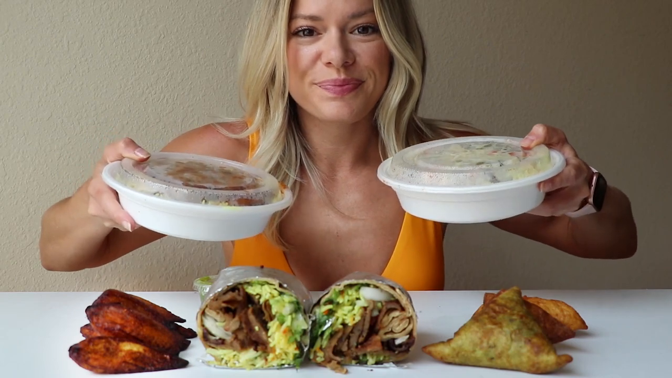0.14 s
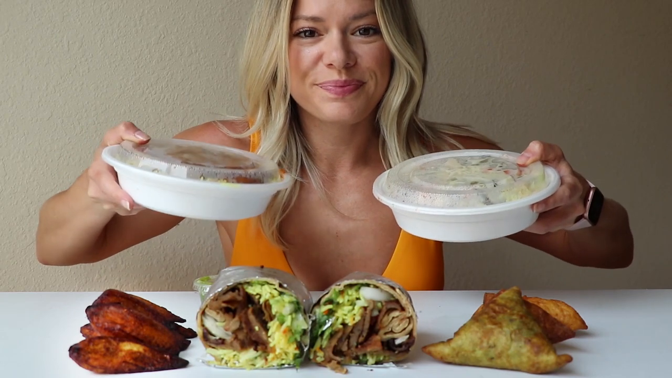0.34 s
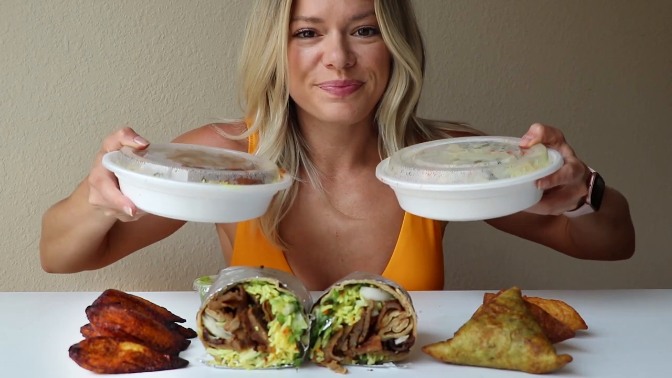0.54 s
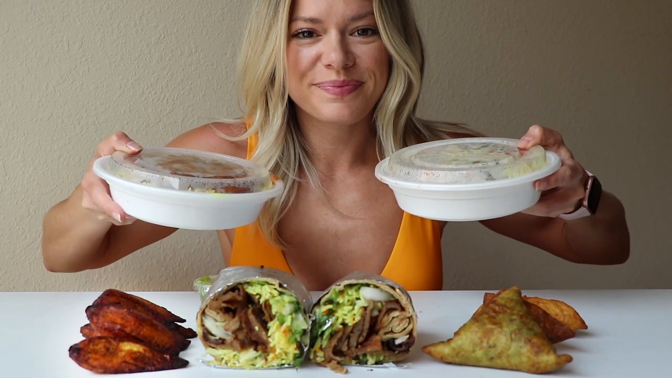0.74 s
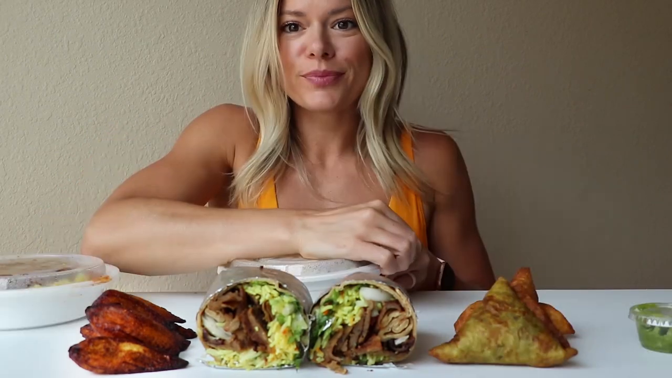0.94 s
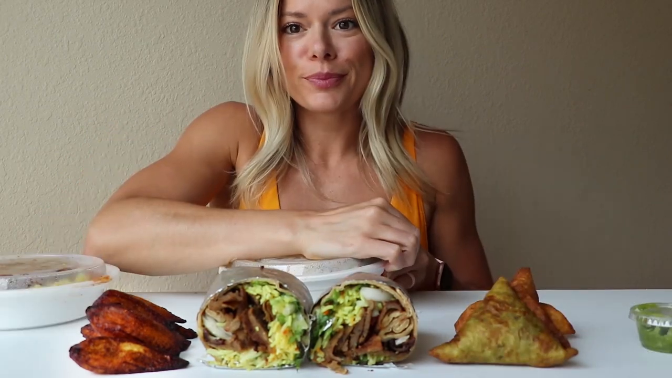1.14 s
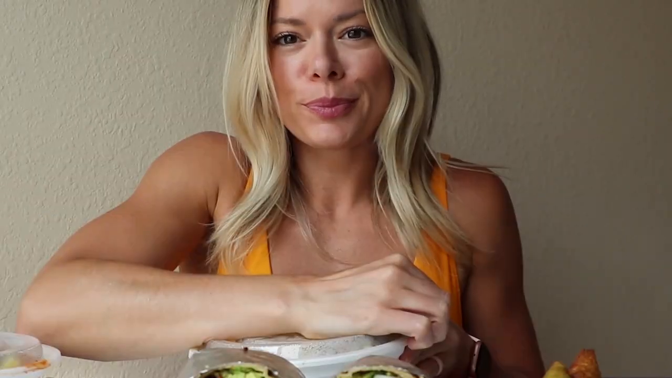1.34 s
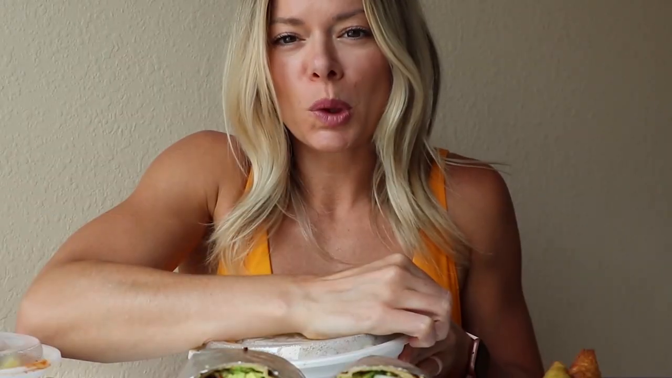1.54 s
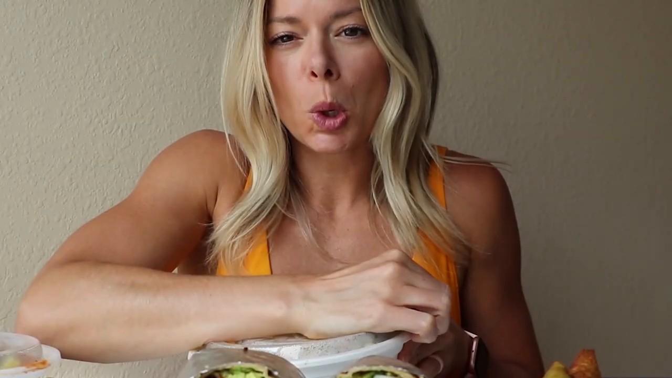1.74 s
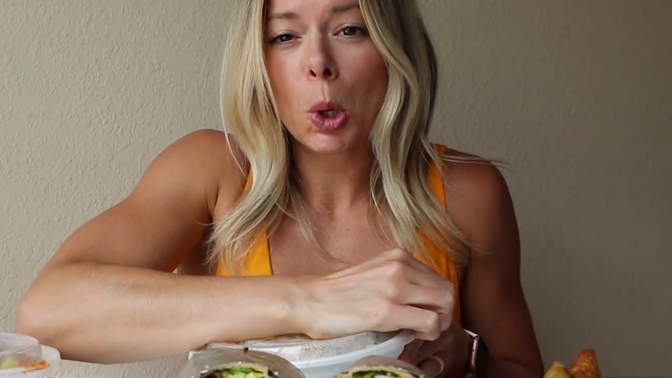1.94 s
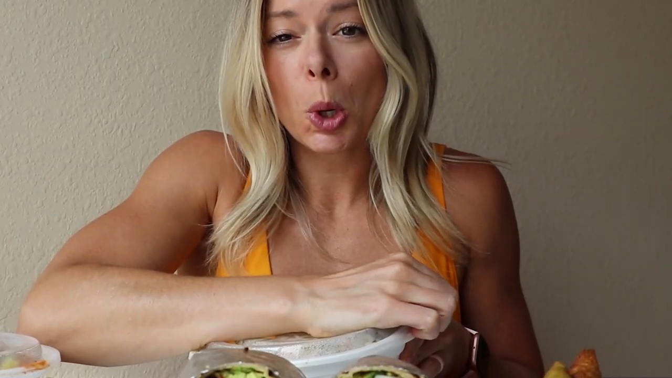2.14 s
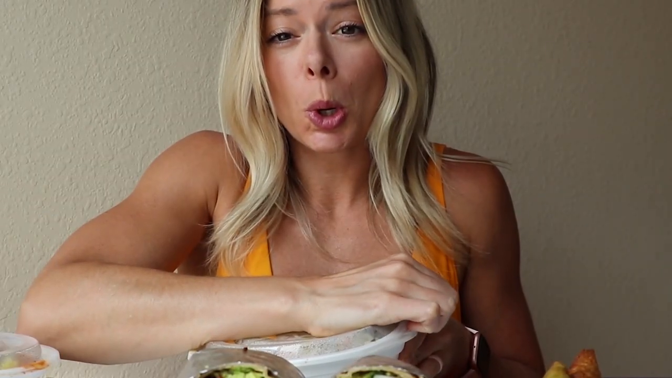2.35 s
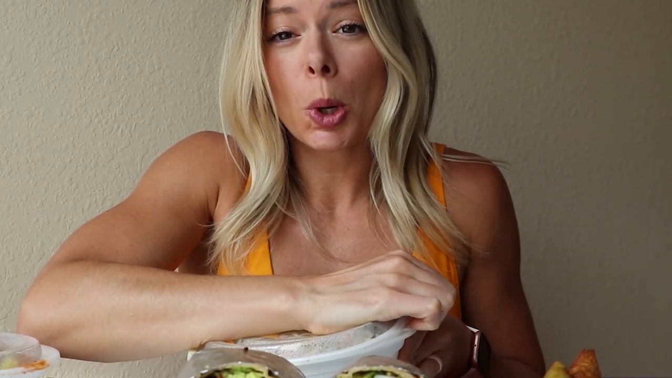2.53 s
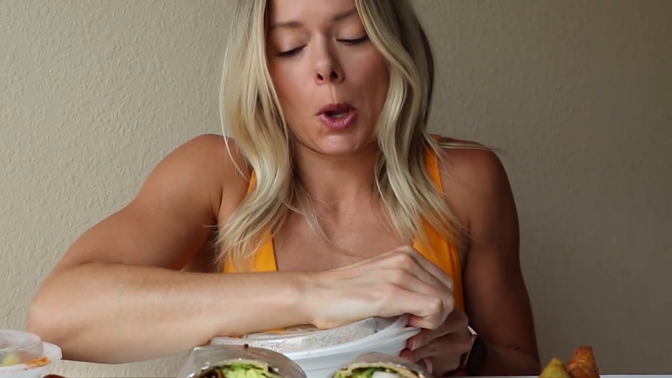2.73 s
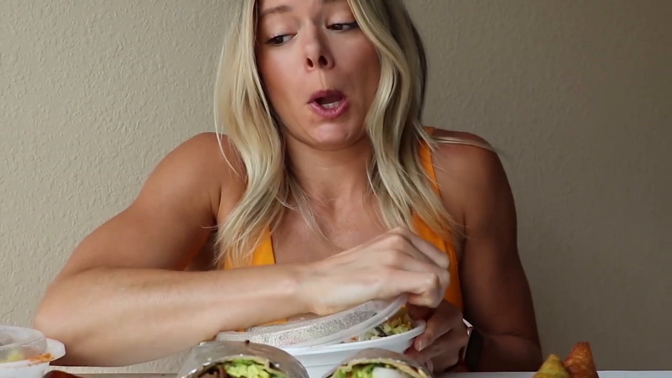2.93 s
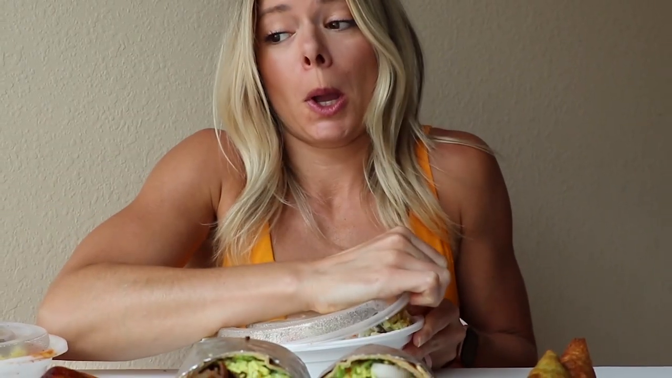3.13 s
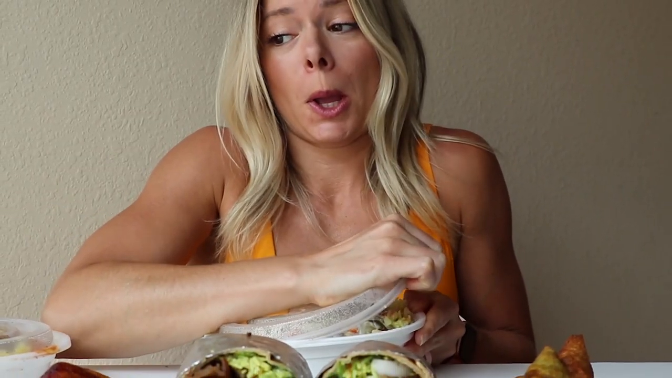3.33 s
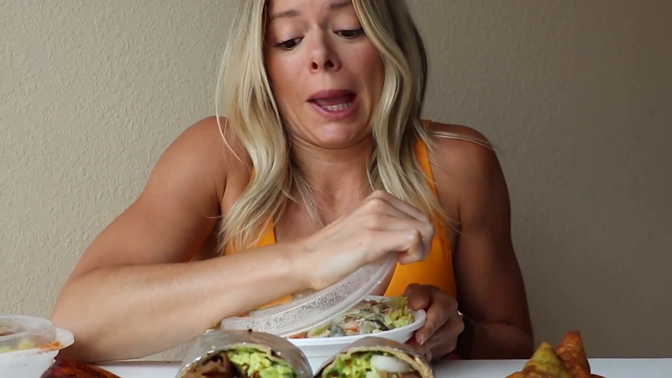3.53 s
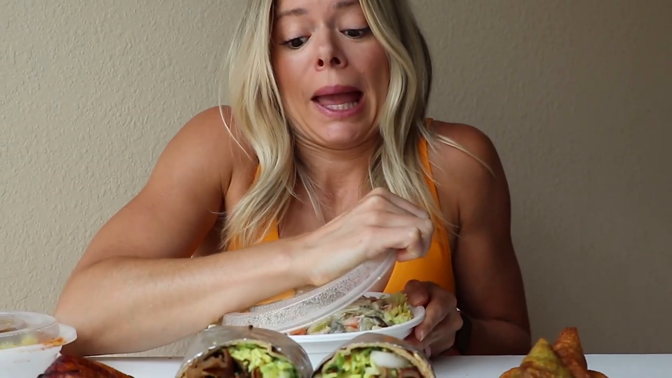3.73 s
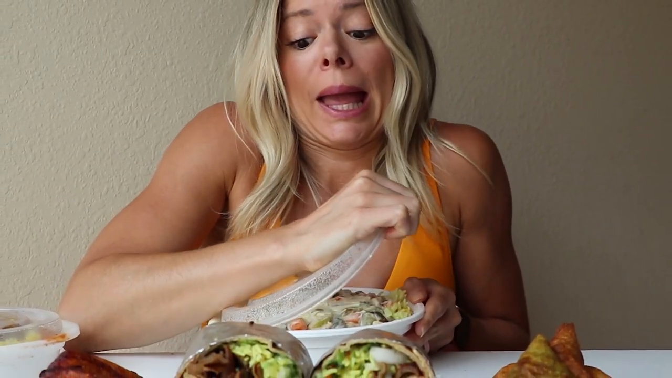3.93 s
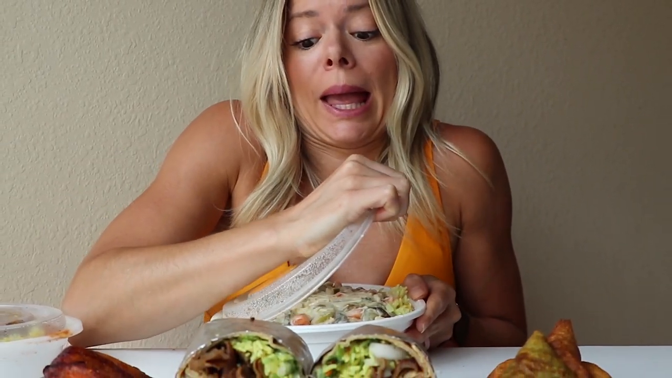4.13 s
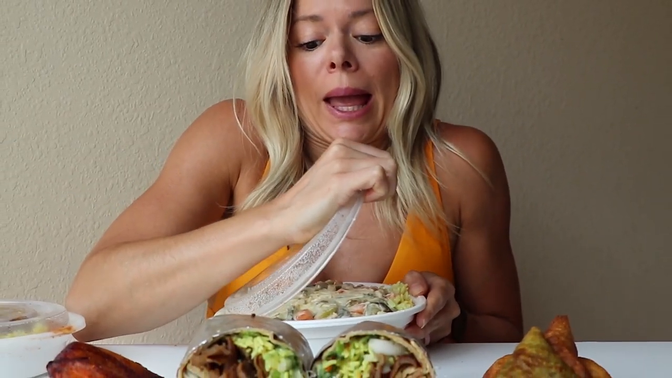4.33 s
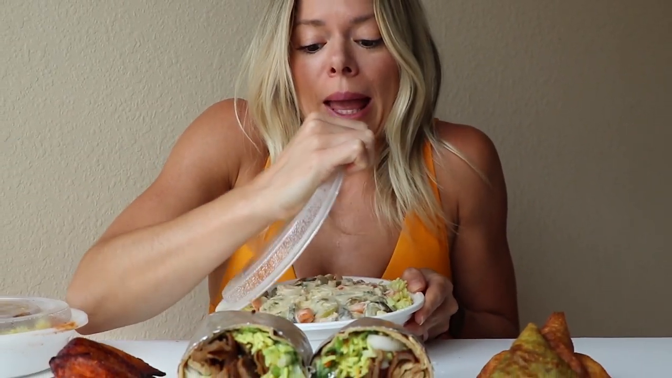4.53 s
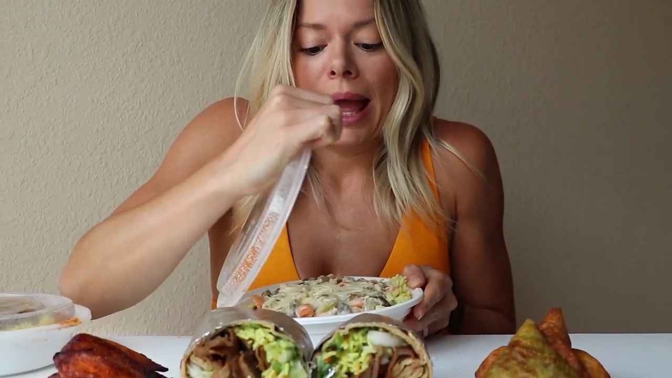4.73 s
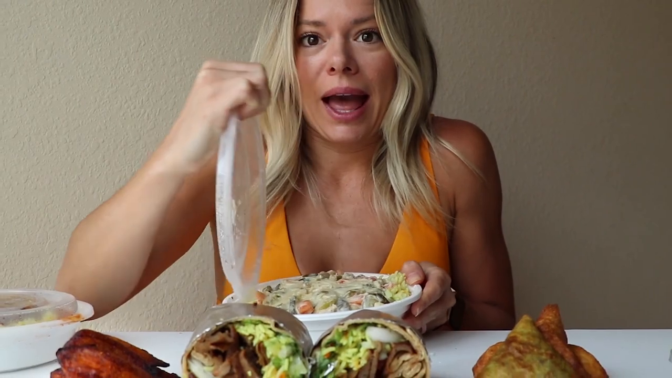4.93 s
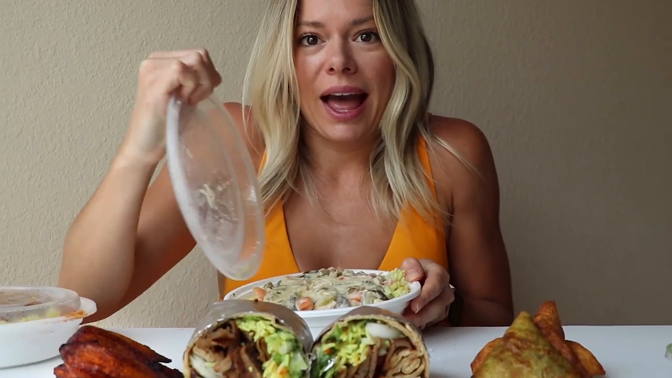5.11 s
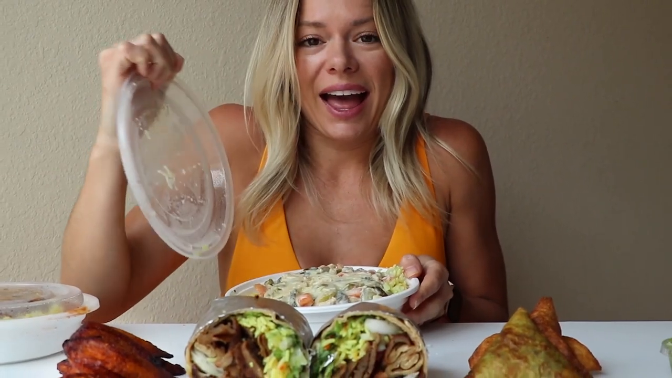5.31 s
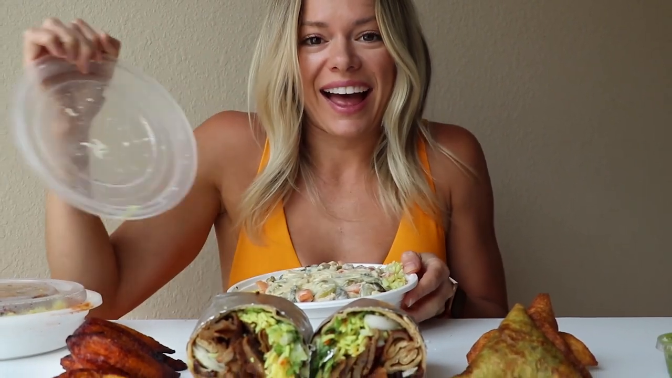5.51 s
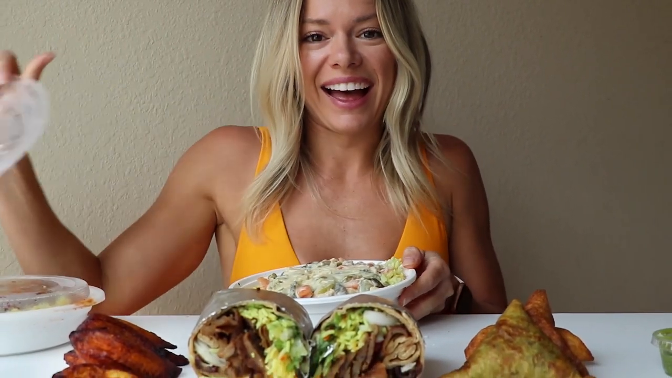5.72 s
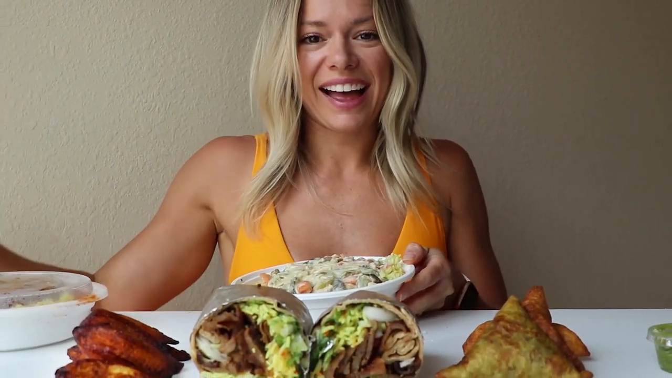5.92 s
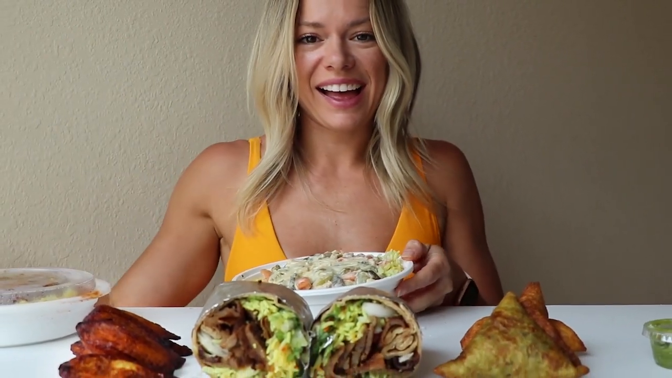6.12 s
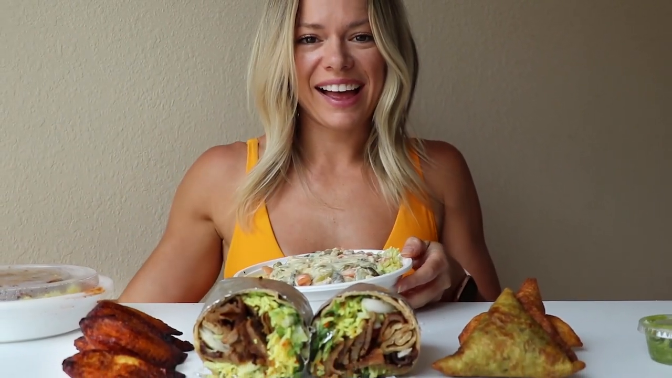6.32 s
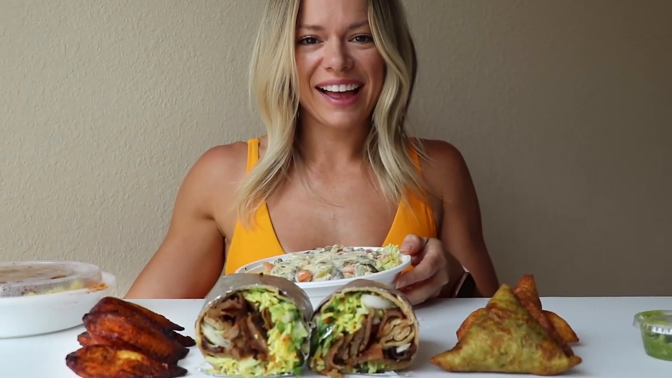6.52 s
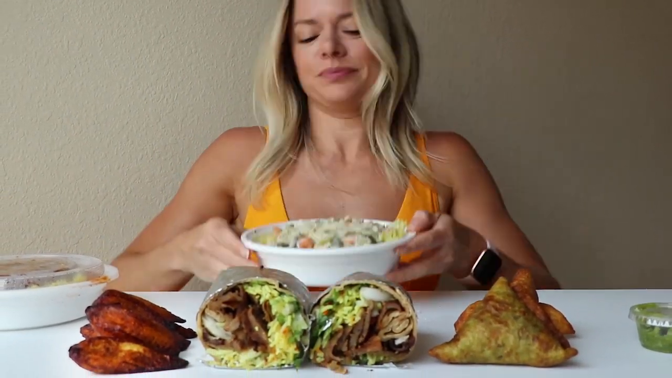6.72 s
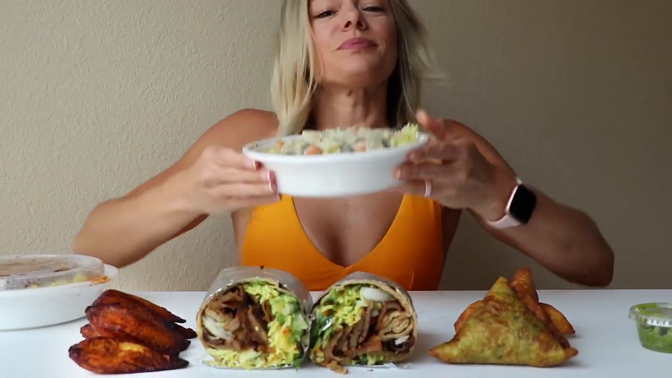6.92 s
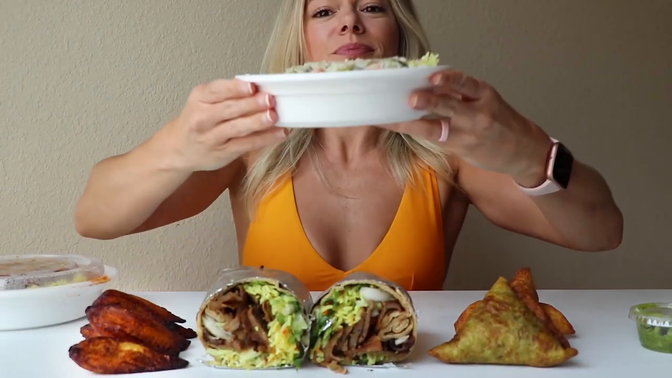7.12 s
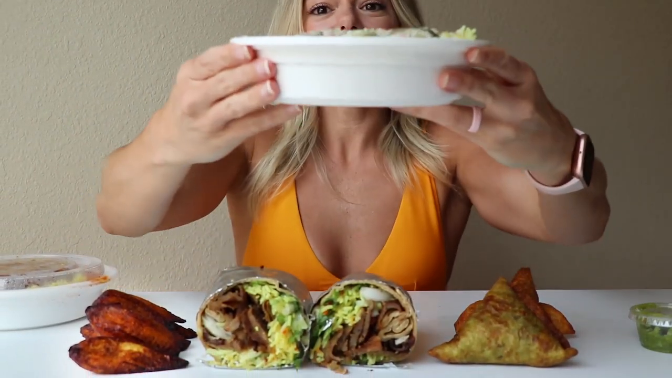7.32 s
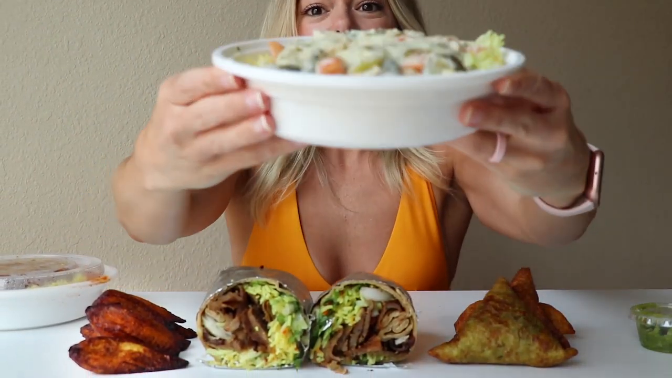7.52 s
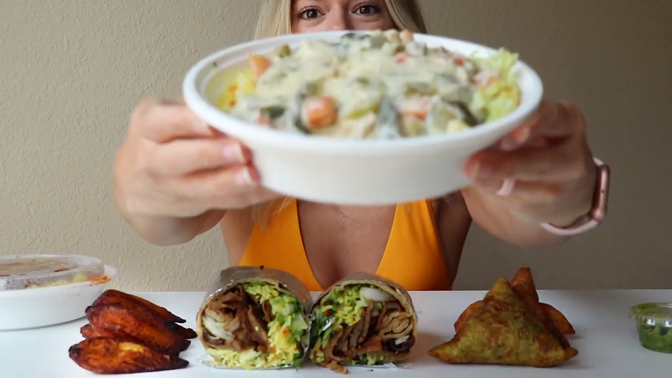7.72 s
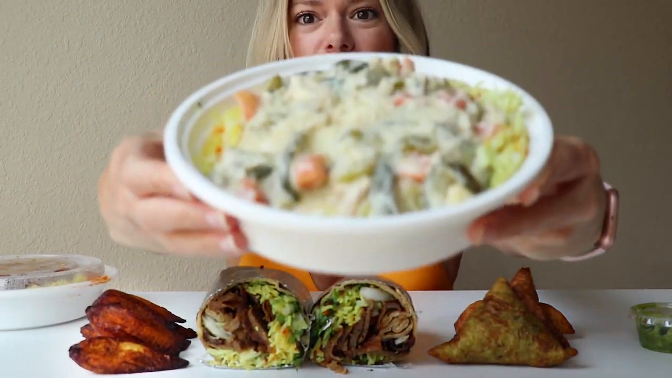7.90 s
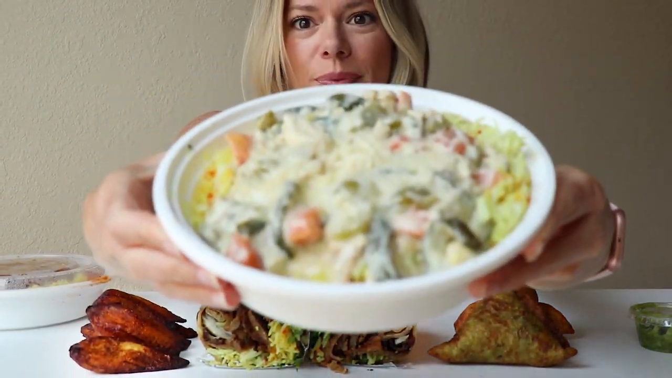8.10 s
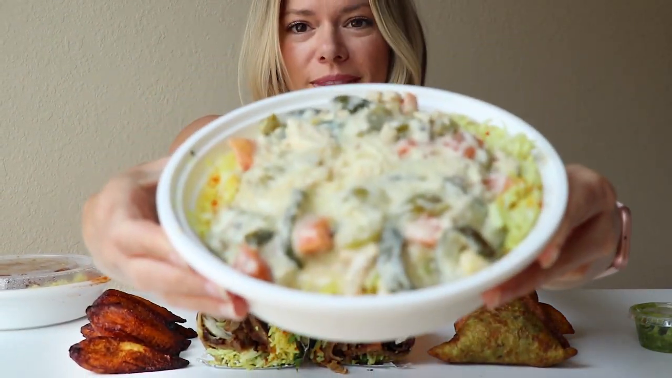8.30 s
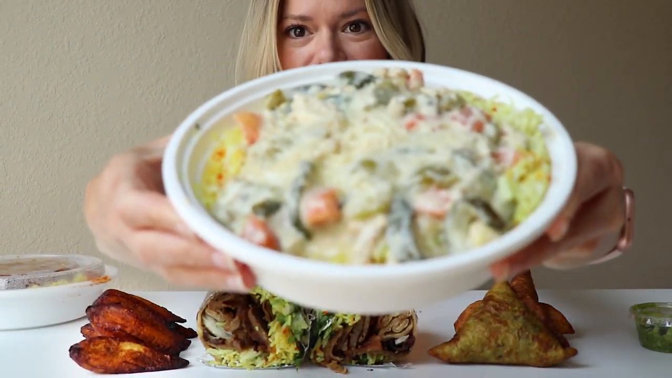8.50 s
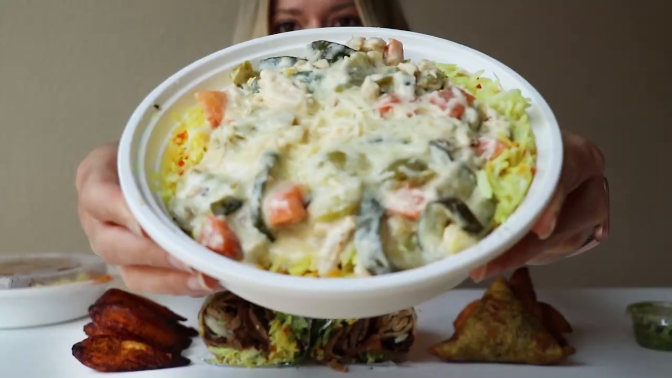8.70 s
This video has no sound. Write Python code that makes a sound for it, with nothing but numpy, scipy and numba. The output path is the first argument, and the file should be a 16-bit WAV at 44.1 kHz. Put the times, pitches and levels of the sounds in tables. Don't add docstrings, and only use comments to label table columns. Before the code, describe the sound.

About a metre from a phone microphone, stiff plastic creaks and ticks, with isolated hard snaps as the seal breaks. It unzips in a rapid crackle and pops free with loud snaps that thud the table and echo briefly off bare walls. After a pause the lid lands with small bounces; sparse high clicks on the bowl, a tiny squeak and a very faint hum follow.

```python
import sys
import numpy as np
from scipy import signal
from scipy.fft import rfft, irfft, next_fast_len
from scipy.io import wavfile
from scipy.ndimage import uniform_filter1d, minimum_filter1d
from numba import njit

SR = 44100
rng = np.random.default_rng(int(sys.argv[2]) if len(sys.argv) > 2 else 0)


def invert_db(x):
    u = np.asarray(x, float) / 20
    return 10 ** u


def output_pcm(signal):
    pcm = np.clip(np.atleast_2d(signal).T, -1, 1) * 32767
    wavfile.write(sys.argv[1], SR, np.round(pcm).astype(np.int16))


N = 390417
T = np.arange(N) / SR
STRIKE = 6144
KNEE_DB, RATIO = -9.5, 2.3
PEEL_HZ, PEEL_THUD_DB = 930, -21.5

# pitch in Hz, level in dB, time to fade by 60 dB in seconds.
LID_MODES = [(350, -14, 0.03), (506, -20.5, 0.0055), (537, -0.5, 0.031), (681, -1, 0.051), (757, 1, 0.039),
             (862, 7.5, 0.022), (984, 10.5, 0.011), (1055, -1, 0.09), (1233, 6.5, 0.0314), (1340, 6, 0.027),
             (1434, 13, 0.011), (1700, 15, 0.0061), (1880, 8, 0.025), (2200, -10.5, 0.012)]
# frequency in Hz, level in dB per Hz.
CRACK_COLOUR = [(1700, -18.5), (2300, -8), (2900, -3.5), (3700, -3.5), (5000, -7), (6500, -5), (8500, -4),
                (11000, -9.5), (13000, -14), (16300, -29.5)]


def on_log(hz, table):
    at, value = np.transpose(table)
    return np.interp(np.log(np.maximum(hz, 1)), np.log(at), value)


def colour(x, table):
    size = next_fast_len(x.shape[-1])
    hz = np.arange(size // 2 + 1) * SR / size
    return irfft(rfft(x, size) * invert_db(on_log(hz, table)), size)[..., :x.shape[-1]]


def unit(x):
    return x / np.sqrt(np.mean(x ** 2))


def swell(s, hold_s, db, rise, fall):
    return invert_db(db - rise * np.maximum(s - T, 0) - fall * np.maximum(T - s - hold_s, 0))


def pair(mid, side, hz):
    # frequency in Hz, left-right likeness from 0 to 1.
    likeness = [(40, 0.79), (125, 0.68), (300, 0.75), (700, 0.36), (1500, 0.068), (3000, 0), (6000, 0.073),
                (11000, 0.078), (15000, 0.0)]
    alike = np.clip(on_log(hz, likeness), 0, 1)
    return mid * np.sqrt((1 + alike) / 2) + np.array([[1], [-1]]) * side * np.sqrt((1 - alike) / 2)


def air():
    # frequency in Hz, level in dB per Hz.
    air_colour = [(12, -27), (20, -10), (49, -4.5), (159, -12.5), (243, -4), (380, -10.5), (414, -7.5),
                  (504, -12.5), (548, -13.5), (1200, -17), (3600, -24), (5000, -29.5), (6500, -25.5),
                  (10100, -25.5), (16300, -36)]
    size = next_fast_len(N)
    mid, side = rfft(colour(rng.standard_normal((2, size)), air_colour))
    bed = irfft(pair(mid, side, np.arange(len(mid)) * SR / size), size)[:, :N]
    return invert_db(-54.5) * bed / np.sqrt(np.mean(bed.mean(axis=0) ** 2))


def ring(modes, gain_db, detune, cycles=38):
    hz, db, t60 = np.transpose(modes)[:, :, None]
    t60 = np.minimum(t60, cycles / hz)
    t = np.arange(STRIKE) / SR
    swings = np.sin(2 * np.pi * hz * detune[:, None] * t) * 1000. ** (-t / t60)
    y = (invert_db(db + gain_db[:, None]) * swings).sum(axis=0)
    y = y * (1 - np.exp(-t / 0.00034))
    y = signal.sosfilt(signal.butter(3, 0.78 * hz.min(), "highpass", fs=SR, output="sos"), y)
    return y / np.abs(y).max()


def clicks(events, modes, crackle, crack_s=0.0024, focus_db=9, cycles=38, room_db=0):
    # pitch in Hz, level in dB, time to fade by 60 dB in seconds.
    table_modes = [(74, -32, 0.17), (108.5, -17.5, 0.32), (185, -2.5, 0.16), (251, -31, 0.072),
                   (316, 2.5, 0.15), (399, -2.5, 0.075), (522, 9.5, 0.024)]
    out, t = np.zeros((2, N + STRIKE)), np.arange(STRIKE) / SR
    hz = np.array(modes)[:, 0]
    even = colour(np.arange(STRIKE) == 64, crackle)
    for s, db, crack_db, centre_hz, thud_db in events:
        luck = rng.standard_normal((4, 20))
        near = -focus_db * np.abs(np.log2(hz / centre_hz))
        scatter_db = 2.5 * luck[[0, 2]]
        body = ring(modes, near + scatter_db[0, :len(hz)], 1 + .012 * luck[1, :len(hz)], cycles)
        count = len(table_modes)
        thud = ring(table_modes, scatter_db[1, :count], 1 + .02 * luck[3, :count])
        body = body + invert_db(thud_db) * thud * (1 - np.exp(-t / .004))
        crack = colour(rng.standard_normal(STRIKE), crackle) * np.exp(-t / crack_s)
        crack *= invert_db(crack_db + 8) / np.abs(crack).max()
        spread = even * np.sqrt(np.sum(crack ** 2) / np.sum(even ** 2))
        db += (RATIO - 1) * max(db - KNEE_DB - 6, 0)
        start = int(s * SR)
        both = np.array([body + crack, invert_db(room_db) * (body + spread)])
        out[:, start:start + STRIKE] += invert_db(db) * both
    return out[:, :N]


def creak(pushes, modes, rise, fall, slips, body_db, grit_db, centre_hz, focus_db, room_db=-3):
    swells = np.array([swell(*row[:-1], rise, fall) for row in pushes])
    level = swells.sum(axis=0)
    scrape = invert_db(np.array(pushes)[:, -1]) @ swells
    near = -focus_db * np.abs(np.log2(np.array(modes)[:, 0] / centre_hz))
    luck = rng.random((3, N))
    slip = (luck[0] < slips / SR) * np.sign(luck[1] - .5) * invert_db(-2.5 * np.log(luck[2]))
    strike = ring(modes, near, np.ones(len(modes)))
    body = signal.oaconvolve(uniform_filter1d(slip, size=5), strike)[:N]
    bursts = signal.lfilter([1], [1, -.97], np.abs(slip))
    grit = colour(bursts * rng.standard_normal(N), CRACK_COLOUR)
    sound = invert_db(body_db) * level * unit(body) + invert_db(grit_db) * scrape * unit(grit)
    return invert_db(np.array([[0], [room_db]])) * sound


def pry():
    # start in seconds, peak in dB, crack in dB, ring centre in Hz.
    slips = [(0.976, -37.5, -17, 660), (1.024, -30.5, -47, 1170), (1.138, -28.5, -31.5, 644),
             (1.184, -50, -11, 850), (1.229, -37, -4, 2080), (1.36, -23, -18, 1130), (1.469, -32, -14, 844),
             (1.569, -40.5, -10, 1250), (1.736, -23, -42, 1240), (1.747, -26, -16.5, 538),
             (2.052, -24, -20, 1180), (2.077, -16.5, -17.5, 1380), (2.111, -28, -17, 880),
             (2.16, -23, -14, 655), (2.189, -25, -18, 660), (2.259, -28.5, -22, 845),
             (2.411, -38.5, -13, 1120), (2.439, -19.5, -14, 1350), (2.518, -34, -14, 869),
             (2.594, -28, -21, 880), (2.623, -35, -26.5, 896), (2.825, -34, -22, 743),
             (3.333, -40, -45, 635), (3.352, -30.5, -45, 654), (3.375, -27, -34, 864),
             (3.424, -35, -27, 711), (3.44, -27.5, -30.5, 697), (3.449, -27, -20, 643)]
    # frequency in Hz, level in dB per Hz.
    soft_colour = [(1200, -13), (2200, -6.5), (3400, -3.5), (4800, -11), (8000, -12), (11000, -17.5),
                   (16300, -33)]
    events = [(*row, -20) for row in slips]
    return clicks(events, LID_MODES, soft_colour, crack_s=0.0033, focus_db=12.5, cycles=28, room_db=-1.5)


def rim_creak():
    # time of full level in seconds, hold in seconds, level in dB, scrape in dB.
    pushes = [(1.02, 0.08, -48, -14), (1.148, 0.04, -61, -10), (1.362, 0.012, -43, -19),
              (1.748, 0.013, -36, -10), (2.086, 0.11, -34, -22), (2.438, 0.016, -33.5, -14),
              (2.493, 0.05, -26.5, -28), (2.6, 0.025, -33.5, -26), (2.822, 0.031, -34, -19.5),
              (3.335, 0.058, -37.5, -29), (3.438, 0.064, -33.5, -20), (3.88, 0.027, -22.5, -22),
              (3.93, 0.24, -29.5, -14), (4.225, 0.078, -30.5, -12)]
    return creak(pushes, LID_MODES, rise=810, fall=640, slips=520, body_db=-9, grit_db=-2.5,
                 centre_hz=910, focus_db=15)


def tight_snaps():
    # start in seconds, peak in dB, crack in dB, ring centre in Hz, thud in dB.
    snaps = [
        (1.199, -37, 3, 1900, -25),
        (1.854, -12, -2.5, 620, -13.5),
        (1.864, -6.5, -3.5, 1560, -51),
        (2.889, -2, -1.5, 1210, -28),
        (2.8935, -6.5, -9, 420, -11),
    ]
    # frequency in Hz, level in dB per Hz.
    tight_colour = [(1700, -14), (2600, -12.5), (3700, -2), (5200, -5), (7000, -2), (10000, -6),
                    (13000, -14.5), (16300, -32)]
    return clicks(snaps, LID_MODES, tight_colour, crack_s=0.0016, focus_db=13, room_db=-0.76)


def nail_ticks():
    # start in seconds, peak in dB, crack in dB.
    ticks = [
        (1.712, -59, 8.3),
        (1.782, -45.5, 14.5),
        (1.816, -47, 12.6),
        (2.111, -45, 10.5),
    ]
    # frequency in Hz, level in dB per Hz.
    tick_colour = [(5000, -24), (7500, -1), (9000, 9), (11000, -7), (13500, -16)]
    events = [(*row, PEEL_HZ, PEEL_THUD_DB) for row in ticks]
    return clicks(events, LID_MODES, tick_colour, crack_s=0.00091, room_db=-5)


def unzip():
    # start in seconds, peak in dB, crack in dB.
    ticks = [(1.849, -27, -2), (3.473, -28, -17), (3.853, -25, -19), (3.88, -29, -25.5), (3.891, -23, -14),
             (3.915, -14.5, -6.5), (3.934, -19.5, -22), (3.958, -15, -6.5), (3.979, -18, -10),
             (4.001, -13, -7.5), (4.111, -17.5, -20), (4.124, -21.5, -16), (4.141, -24, -7),
             (4.161, -21.5, -4), (4.198, -21, 0), (4.221, -14, -11), (4.241, -18, -27), (4.259, -15, -6.5),
             (4.28, -22, -13), (4.301, -16, -7.5), (4.333, -16.5, -6.5)]
    # frequency in Hz, level in dB per Hz.
    fine_colour = [(2500, -2), (3200, 2), (4200, -12), (5500, -5), (7500, -1.5), (9500, -0.5),
                   (12000, -14.5), (16300, -39)]
    start_s, gap_s, run_db, crack_db, dull_db = 4.02, 0.011, -19, -2.5, -11
    luck = rng.standard_normal((10, 2)) * [.0005, 2.]
    run = [(start_s + gap_s * k + late_s, run_db + db, crack_db + dull_db * (k % 2))
           for k, (late_s, db) in enumerate(luck)]
    events = [(*tick, PEEL_HZ, PEEL_THUD_DB) for tick in ticks + run]
    return clicks(events, LID_MODES, fine_colour, crack_s=0.00054, focus_db=35.5)


def free_snaps():
    # start in seconds, peak in dB, crack in dB, ring centre in Hz, thud in dB.
    snaps = [(3.491, -8, -5, 640, -14.5), (3.534, -10.5, -10.5, 835, -14.5), (3.5825, -6, -20, 690, -20.5),
             (3.5853, -1.5, -9.5, 1345, -15.5), (3.631, -9, -5.5, 885, -17), (4.346, -2, -6.5, 935, -22),
             (4.373, -11.5, 2, 1350, -13), (4.425, -3.5, -4.5, 750, -26), (4.58, -2.5, -6, 1340, -28),
             (4.591, -4, -7, 1280, -9), (4.641, -2, -4.5, 1340, -13)]
    return clicks(snaps, LID_MODES, CRACK_COLOUR, room_db=-1.25)


def set_down():
    # pitch in Hz, level in dB, time to fade by 60 dB in seconds.
    flat_modes = [(271, -12, 0.16), (344, -6, 0.013), (493, -8.5, 0.021), (506, -5, 0.035),
                  (625, -0.5, 0.016), (912, -2, .03), (1007, -2.5, 0.024), (1180, -2.5, 0.038),
                  (1340, 3, 0.0071), (1620, -6, .012), (1840, 1.5, 0.0059), (2920, 5, 0.0052),
                  (3320, 6.5, 0.0058)]
    # start in seconds, peak in dB, crack in dB, ring centre in Hz, thud in dB.
    knocks = [
        (6.042, -30.5, -1, 1700, -26),
        (6.092, -13.5, -10, 543, -9),
        (6.104, -16, -38, 641, -35),
        (6.149, -21, -36, 506, -32),
        (6.243, -21, -31, 1050, -14),
        (6.569, -35, -19, 1340, -5.5),
    ]
    # time of full level in seconds, hold in seconds, level in dB, scrape in dB.
    rocking = [
        (5.88, 0.053, -51, -2.5),
        (5.97, 0.012, -52, 4),
        (6.112, 0.099, -31.5, -17),
        (6.248, 0.092, -29, -32),
        (6.4, 0.064, -56, -17),
    ]
    landing = clicks(knocks, flat_modes, CRACK_COLOUR, crack_s=0.0039, focus_db=2.5, cycles=21.0)
    return landing + creak(rocking, flat_modes, rise=750, fall=570, slips=900, body_db=-7.0, grit_db=-4.5,
                           centre_hz=503, focus_db=6.0, room_db=-1.5)


def bowl_taps():
    # pitch in Hz, level in dB, time to fade by 60 dB in seconds.
    bowl_modes = [(400, 4, 0.053), (1120, -26, 0.0014), (1456, 6, 0.0054), (1740, 5.5, 0.028),
                  (2050, 10, 0.029), (2340, -3, 0.024), (3200, 14.5, 0.018), (3890, 10, 0.012),
                  (4700, 8, 0.0017)]
    # start in seconds, peak in dB, crack in dB, ring centre in Hz, thud in dB.
    taps = [
        (6.8134, -32, -1.5, 3600, -11),
        (7.336, -43, -10, 1210, -23),
        (7.3556, -34.5, -8, 2090, -7.5),
        (7.4893, -20, -7.5, 2050, -14),
        (7.9467, -26.5, -13, 2320, -17.5),
        (8.105, -27, -18.5, 2140, -12.5),
    ]
    # frequency in Hz, level in dB per Hz.
    tap_colour = [(900, -41), (1500, -7), (2500, -3.5), (4000, -2.5), (5000, -11.5), (6500, -1.5),
                  (9000, -8), (12000, -14.5), (16300, -28)]
    return clicks(taps, bowl_modes, tap_colour, crack_s=.003, focus_db=4, cycles=10)


def far_motor():
    # time of full level in seconds, hold in seconds, level in dB.
    hums = [
        (7.724, 0.01, -60),
        (7.942, 0.01, -61),
        (8.142, 0.33, -60),
        (8.68, 0.03, -59),
    ]
    level = sum(swell(*row, 220, 190) for row in hums)
    return level * np.sqrt(2) * np.sin(2 * np.pi * 99 * T)


def squeak():
    # start in seconds, length in seconds, from Hz, to Hz, level in dB.
    skid = (7.732, .04, 3900, 3400, -50)
    s, length, from_hz, to_hz, db = skid
    u = np.clip((T - s) / length, 0, 1)
    flutter_db = 4.7 * unit(uniform_filter1d(rng.standard_normal(N), size=60))
    hz = from_hz + (to_hz - from_hz) * u
    chirp = np.sin(2 * np.pi * np.cumsum(hz) / SR)
    return invert_db(db + flutter_db) * np.sin(np.pi * u ** 0.81) * chirp


def echoes(direct):
    # delay in seconds, level in dB.
    bounces = [
        (.0028, -9),
        (.0042, -9.5),
        (.007, -7.5),
        (.0115, -18),
        (.015, -11.5),
    ]
    path = np.zeros((2, 1024))
    path[[0, 1], [1, 0]] = invert_db(-0.8)
    for k, (s, db) in enumerate(bounces):
        turn = (-1) ** k
        at = int(s * SR)
        path[[0, 1], [at, at + 3 * turn]] += invert_db(db) * turn
    return signal.oaconvolve(direct[None], path, axes=1)[:, :N]


def room(send):
    # frequency in Hz, level in dB.
    tail_db = [(125, -3), (300, -6.5), (700, -5.5), (1500, -2.5), (3000, -1.5), (6000, -4.5), (12000, -5.5)]
    # frequency in Hz, time to fade by 60 dB in seconds.
    tail_t60 = [(125, 0.34), (300, 0.56), (700, 0.68), (1500, 0.59), (3000, 0.63), (6000, 0.51),
                (12000, 0.32)]
    size = int(.9 * SR)
    t, tail = np.arange(size) / SR, 0
    for hz in 90 * 2 ** np.arange(0, 7.6, .5):
        sos = signal.butter(2, [hz / 1.295, hz * 1.23], "bandpass", fs=SR, output="sos")
        mid, side = signal.sosfilt(sos, rng.standard_normal((2, size)))
        fade = 1000. ** (-t / on_log(hz, tail_t60))
        tail = tail + invert_db(on_log(hz, tail_db)) * pair(mid, side, hz) * fade
    tail = invert_db(-29.5) * tail * (1 - np.exp(-t / 0.00043))
    return signal.oaconvolve(send[None], tail, axes=1)[:, :N]


def scene():
    lid = pry() + rim_creak() + tight_snaps() + nail_ticks() + unzip() + free_snaps()
    direct, send = lid + set_down() + bowl_taps()
    return echoes(direct + squeak()) + room(send) + air() + far_motor()


@njit
def follow(x, attack, release):
    e, out = 0., np.empty(len(x))
    for i in range(len(x)):
        e += (x[i] - e) * (attack if x[i] > e else release)
        out[i] = e
    return out


def band_limit(x):
    return signal.sosfilt(signal.butter(12, 16480, fs=SR, output="sos"), x)


def record(dry):
    ahead = -minimum_filter1d(-np.abs(dry).max(axis=0), size=45)
    level = follow(ahead, 1 / (0.0056 * SR), 1 / (0.065 * SR))
    gain = np.minimum(1, (invert_db(KNEE_DB) / (level + 1e-9)) ** (1 - 1 / RATIO))
    return band_limit(np.clip(dry * gain, -.95, .95))


dry = scene()
out = record(dry)
output_pcm(out)
```